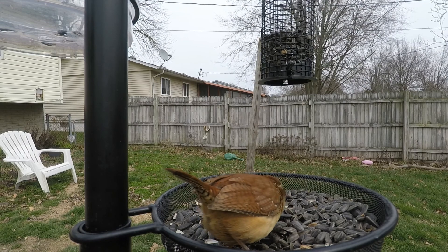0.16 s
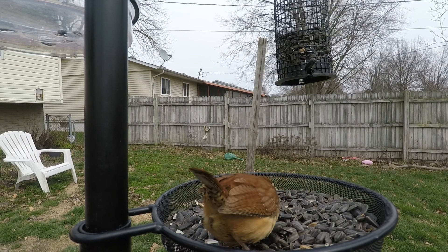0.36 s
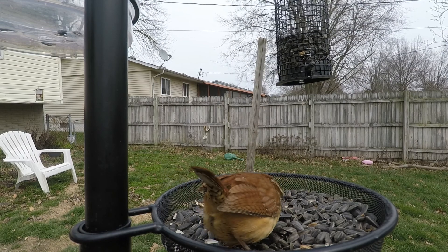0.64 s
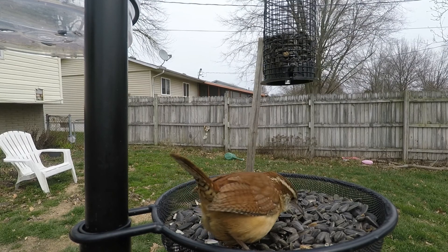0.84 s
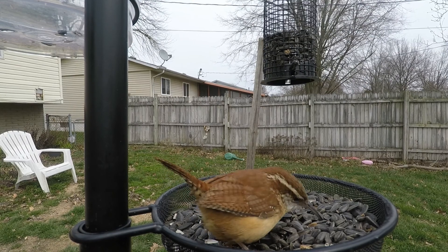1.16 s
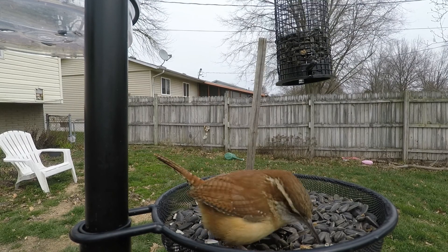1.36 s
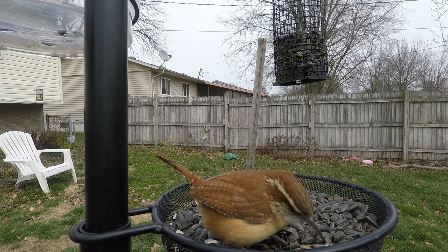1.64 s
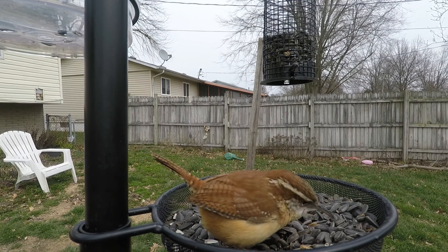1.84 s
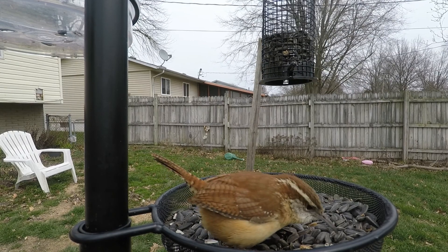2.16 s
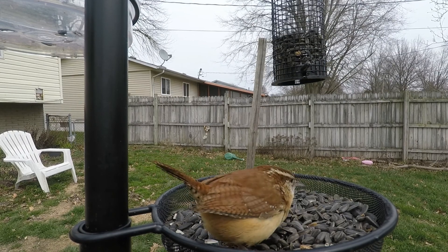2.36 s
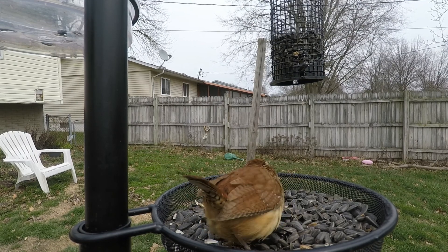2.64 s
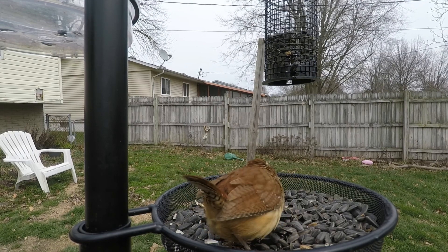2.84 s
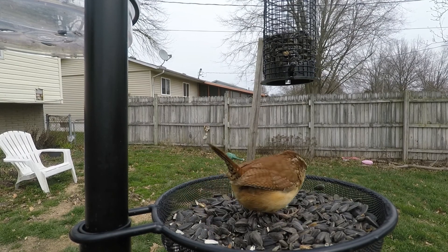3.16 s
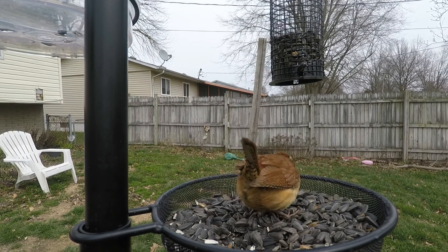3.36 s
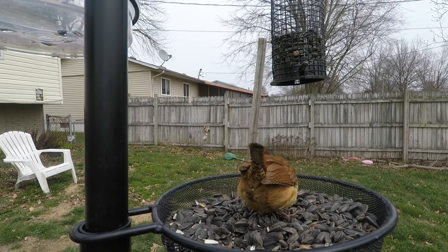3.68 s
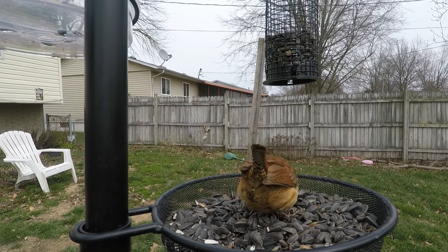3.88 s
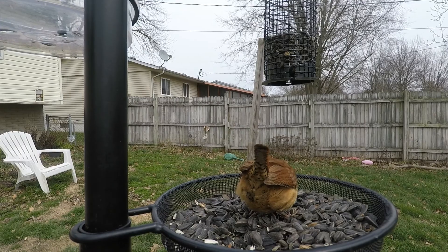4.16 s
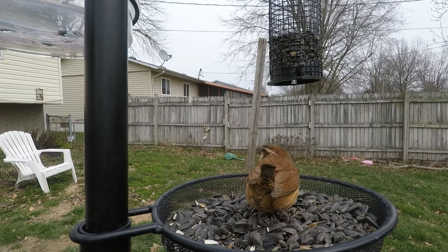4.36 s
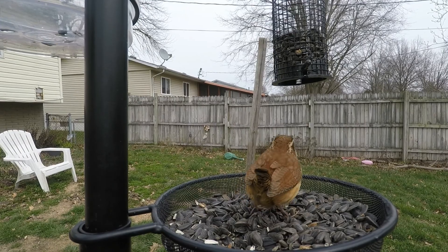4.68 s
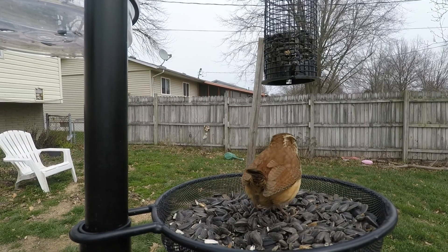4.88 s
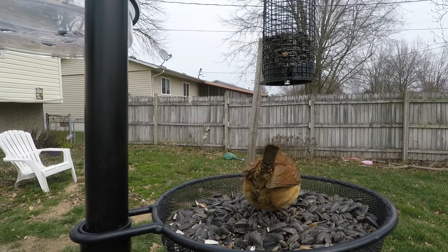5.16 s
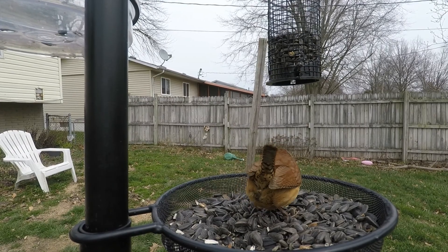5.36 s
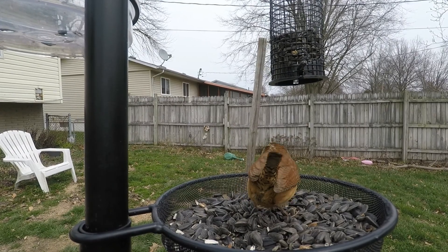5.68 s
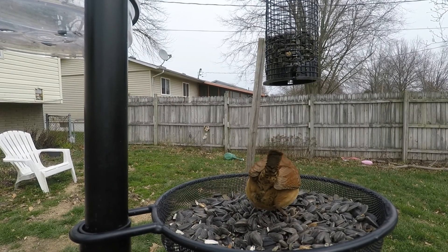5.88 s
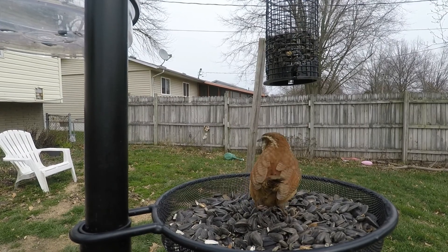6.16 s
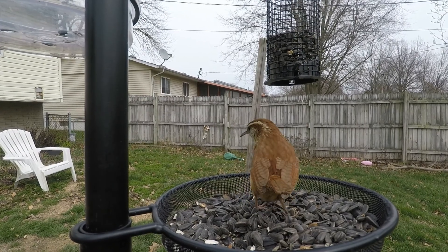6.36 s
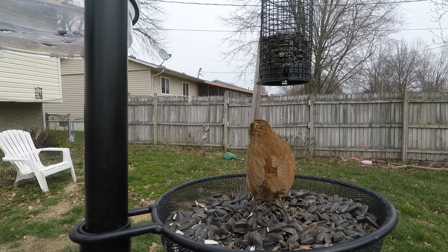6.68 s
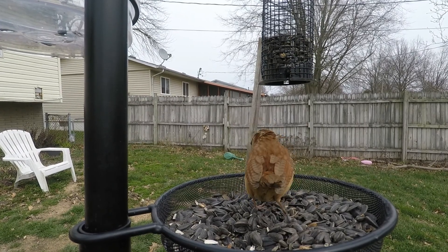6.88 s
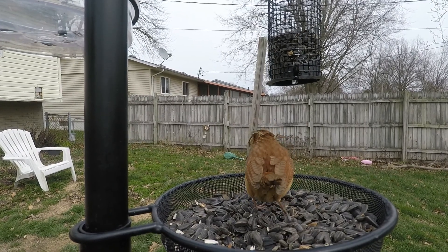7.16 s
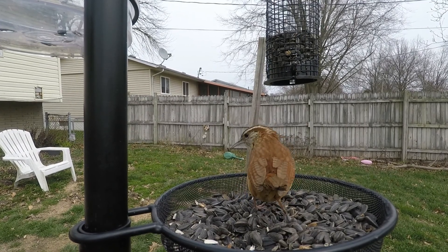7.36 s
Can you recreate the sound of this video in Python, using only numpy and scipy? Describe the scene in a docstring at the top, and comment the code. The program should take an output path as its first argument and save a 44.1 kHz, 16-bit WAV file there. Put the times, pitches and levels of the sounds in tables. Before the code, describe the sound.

Outdoors in a yard, low wind rumble swells and dips on a microphone mounted on a feeder pole, over faint airy hiss. From 0 to 3 seconds sparrows chirp across the yard: quick gliding whistles at about 0.25, 0.7, 0.85, 2.2 and 2.8 seconds, slightly hoarse, with short echoes, and fainter twitters between. A low pole thump comes near 0.4. At 3.1-3.25 the wren hops: a crisp cluster of metallic snaps and seed clicks. Chirps continue, fainter, until about 4. From 4.05 pecking hits hard, with boomy thuds, hollow knocks and rattling mesh in irregular bursts, strong around 4.1-4.4, 4.7, 5.1-5.5 and 5.9-6.2. The hiss drops and only occasional chirps remain, one around 6.65. Tiny squeaks sound at 6.13 and 6.43. A dense scraping rattle with heavy thumps fills 6.8-7.05, then smaller knocks and pole rumble last until 7.5.

```python
"""In a yard, a wren hops and pecks in a mesh seed tray on a pole that also carries two microphone ports.
Its blows excite the resonant modes of pole and tray, which shake the ports almost in opposition.
Low-passed gust noise rumbles on the ports; sparrows chirp across the yard as gliding tones with echoes.
The background hiss sinks once the pecking is hard; mesh and seeds rattle, and the tray squeaks briefly."""
import sys
import numpy as np
from scipy import signal
from scipy.fft import rfft, irfft
from scipy.io import wavfile
from scipy.ndimage import uniform_filter1d

SR = 44100
rng = np.random.default_rng(int(sys.argv[2]) if len(sys.argv) > 2 else 0)


def master(y):
    """Save y as 16-bit WAV."""
    cut = np.clip(np.atleast_2d(y).T, -1, 1)
    pcm = np.round(cut * 32767)  # scale
    wavfile.write(sys.argv[1], SR, pcm.astype(np.int16))


N = 332073  # samples


def amp(db):
    """Decibel definition: amplitude ratio of a level."""
    return 10 ** (np.asarray(db) / 20)


def evened(x):
    """Normalisation to unit rms."""
    return x / np.sqrt(np.mean(abs(x) ** 2) + 1e-20)


def smoothed(x, size):
    """Low-pass filtering by a moving average passed twice."""
    return uniform_filter1d(uniform_filter1d(x, size=size), size=size)


def read(points, hz):
    """Interpolation of a spectrum along logarithmic frequency."""
    f, value = np.transpose(points)
    return np.interp(np.log(hz + 1), np.log(f + 1), value)


def curves(rows):
    """Linear interpolation in time: each column becomes one value a sample."""
    s, *columns = np.transpose(rows)
    return [np.interp(np.arange(N) / SR, s, c) for c in columns]


def add(mix, s, sound):
    """Superposition: adds a sound at time s, cut off at the end of the mix."""
    part = mix[..., round(s * SR):][..., :sound.shape[-1]]
    part += sound[..., :part.shape[-1]]


def ring(drive, hz, width):
    """Resonance: one mode as a complex pole; white drive of rms 1 gives a ring of rms 1."""
    r = np.exp(-np.pi * width / SR)
    gain = np.sqrt(2 * (1 - r * r))
    return signal.lfilter([gain], [1, -r * np.exp(2j * np.pi * hz / SR)], drive + 1e-15)


def ports(z, right_db, lag):
    """Phase difference: a vibration reaches the right port at another level and phase."""
    left = z.real * amp(-right_db / 2)
    right = (z * np.exp(-1j * lag)).real * amp(right_db / 2)
    return np.array([left, right])


def rung(drive, modes, count=0):
    """Modal superposition: the lowest count modes take the first drive, the rest the last."""
    drive = np.atleast_2d(drive)
    total = 0
    for k, (hz, width, db, right_db, lag) in enumerate(modes):
        once = ring(drive[0 if k < count else -1], hz, width * 1.62)
        # two resonances in a row leave deeper valleys between the modes
        twice = ring(once, hz, width * 1.62) * np.sqrt(np.pi * width * 1.5 / SR)
        total = total + amp(db) * ports(twice, right_db, lag)
    return total / np.sqrt(sum(amp(2 * mode[2]) for mode in modes))


def noise(spectrum, same, right_db, patchy_db, size):
    """Partial coherence: random short-time spectra in drifting patches, partly shared by both ports."""
    frames, hz = 4 * N // size + 5, np.fft.rfftfreq(size, 1 / SR)
    a, b, c, d, patches = rng.standard_normal((frames, len(hz), 5)).T
    patches = uniform_filter1d(patches, size=10, axis=0)  # across frequency
    patches = evened(uniform_filter1d(patches, size=8, axis=1))  # across time
    same = np.clip(read(same, hz), -1, 1)[:, None]
    left = a + 1j * b
    right = same * left + np.sqrt(1 - same ** 2) * (c + 1j * d)
    z = np.array([left, amp(right_db) * right])
    z *= amp(read(spectrum, hz)[:, None] + patchy_db * patches)
    return evened(signal.istft(z, nperseg=size, noverlap=size * 3 // 4)[1][:, :N])


# gusts on the ports: t/s, relative level/dB
GUSTS = [(0, -26.5), (.12, -20.5), (.27, -18.5), (.4, -29), (.57, -17), (.76, -24.5), (.85, -19),
         (.93, -23.5), (1.1, -16.5), (1.22, -23.5), (1.31, -20), (1.43, -28), (1.6, -22), (1.91, -28.5),
         (2.05, -19), (2.14, -21.5), (2.3, -16.5), (2.58, -23), (2.74, -19), (2.9, -24.5), (3.04, -17),
         (3.28, -18.5), (3.34, -32), (3.4, -23), (3.75, -26), (4.1, -23.5), (4.16, -32), (4.96, -38.5),
         (5.36, -25.5), (5.54, -30.5), (5.87, -35.5), (6.0, -30.5), (6.34, -36.5), (6.6, -23.5),
         (6.84, -20.5), (6.95, -38), (7.24, -19), (7.34, -28), (7.53, -28.5)]
# spectrum of the rumble: f/Hz, relative level/dB
RUMBLE = [(12, -9.5), (25, 0), (40, 1.5), (60, -5), (90, -9.5), (140, -18), (220, -26), (320, -37.5),
          (500, -49.5), (900, -84)]
# likeness of left and right: f/Hz, correlation
RUMBLE_SAME = [(30, 0.95), (100, 0.87), (200, 0.17)]


def wind():
    """Turbulent pressure: low noise on the ports, swelling with the gusts."""
    rumble = noise(RUMBLE, RUMBLE_SAME, right_db=4.5, patchy_db=1.5, size=4096)
    return amp(curves(GUSTS)[0] + 1.5) * rumble


# background of the yard: t/s, relative level/dB
YARD = [(0.0, -65.5), (0.29, -64), (3.98, -64), (4.42, -75), (5.49, -75.5), (6.71, -69), (7.53, -72)]
# spectrum of the hiss: f/Hz, relative density/dB per Hz
HISS = [(200, -26), (300, 5.5), (450, -2), (650, -7.5), (900, -4), (1200, -10), (1700, -13.5), (2400, -19),
        (3200, -19), (4500, -24.5), (7300, -21), (10500, -27), (12000, -34.5), (14500, -44)]
# likeness of left and right: f/Hz, correlation
HISS_SAME = [(300, 0.29), (800, -0.49), (2000, -0.25), (3300, 0.5), (5300, 0.18), (9000, -0.059)]


def yard_hiss():
    """Broadband noise: the yard's hiss follows a slow level curve."""
    hiss = noise(HISS, HISS_SAME, right_db=2.0, patchy_db=1.07, size=1024)
    return amp(curves(YARD)[0] + 17.5) * hiss


# swing of the pole: t/s, level/dB
SWAY = [(0, -29), (.31, -44), (.39, -14.5), (.52, -19.5), (.65, -27), (1.3, -35), (1.75, -36), (2.8, -34.5),
        (3.16, -21), (3.4, -27), (3.92, -31), (3.99, -19), (4.06, -22), (4.11, -13), (4.45, -11),
        (4.52, -18.5), (4.65, -11), (5.03, -13), (5.12, -14.5), (5.24, -20), (5.31, -11), (5.45, -18.5),
        (5.8, -15), (5.87, -22.5), (5.96, -13), (6.13, -13.5), (6.45, -10.5), (6.59, -17.5), (6.8, -15.5),
        (6.99, -7.5), (7.05, -21.5), (7.21, -13.5), (7.31, -25), (7.41, -16.5), (7.53, -15)]
# lowest mode of the pole: f/Hz, width/Hz, right port re left/dB, right port lag/rad
POLE = (56, 14, 0, 2.6)


def steadied(z, share):
    """Envelope compression: removes a share of the random swell, so that a ring follows its curve."""
    return evened(z / (abs(z) + 1e-9) ** np.clip(share, 0, 1))


def pole():
    """Fundamental resonance: the pole swings at its lowest mode, wavering a little."""
    hz, width, right_db, lag = POLE
    swing = ring(ring(rng.standard_normal(N), hz, width), hz, width)
    return np.sqrt(2) * amp(curves(SWAY)[0]) * ports(steadied(swing, .75), right_db, lag)


# jolts after which the tray shudders on: t/s, drumming level/dB, hold/s
JOLTS = [(0.35, -20, 0.014), (0.703, -28, 0.0092), (1.635, -29.5, 0.025), (1.943, -25, 0.009),
         (2.608, -24.5, 0.0091), (2.703, -24.5, 0.0057), (3.184, -23.5, 0.042), (3.44, -34.5, 0.027),
         (3.666, -24.5, 0.019), (3.963, -21, .005), (4.089, -14.5, 0.013), (4.21, -13, 0.12),
         (4.368, -18, 0.03), (4.724, -11, 0.061), (4.927, -25.5, 0.025), (5.058, -23.5, .01),
         (5.135, -15.5, 0.009), (5.222, -10.5, 0.017), (5.445, -9.5, 0.041), (5.855, -15.5, 0.0036),
         (5.932, -17.5, 0.026), (6.167, -15.5, 0.055), (6.304, -24.5, 0.016), (6.474, -28.5, 0.027),
         (6.6, -26.5, 0.037), (6.724, -19.5, .01), (6.862, -18, 0.25), (7.242, -24.5, 0.017)]
JOLT_RISE_DB_PER_S, JOLT_FALL_DB_PER_S = 496.5, 181


def jolted():
    """Energy summation: jolts rise fast, hold and die away, and their powers add."""
    s, db, hold = np.transpose(JOLTS)[:, :, None]
    since = np.arange(0, N, 32) / SR - s  # every 32 samples
    rise_db = JOLT_RISE_DB_PER_S * np.minimum(since, 0)
    fall_db = JOLT_FALL_DB_PER_S * np.maximum(since - hold, 0)
    power = amp(2 * (db + rise_db - fall_db)).sum(0)
    return np.repeat(np.sqrt(power), 32)[:N]


# tray between jolts: t/s, drumming level/dB, relative rattle level/dB
REST = [(0, -41, -58), (.36, -42, -39.5), (.56, -46.5, -48.5), (1.4, -34, -46), (2.0, -47, -50.5),
        (2.9, -46, -50), (3.19, -27.5, -33), (3.5, -35, -48.5), (4.0, -32.5, -49), (4.5, -36, -47.5),
        (4.7, -25, -36.5), (5.35, -34.5, -43.5), (5.88, -33, -40.5), (5.96, -28.5, -34), (6.12, -25.5, -30),
        (6.25, -28, -44), (6.4, -36, -36), (6.75, -32, -38.5), (7.2, -34.5, -44), (7.53, -29.5, -34)]
# low tray modes: f/Hz, width/Hz, relative level/dB, right port re left/dB, right port lag/rad
DRUM = [(174.2, 13.7, -1.5, 3.84, 2.77), (208.4, 14.3, -1, 5.16, 2.655), (233.8, 10.2, -0.5, 4.6, 2.733)]


def shudder(jolts):
    """Forced vibration: wind and the bird's weight keep the low tray modes drumming."""
    drum = rung(rng.standard_normal(N), DRUM)
    swell = np.sqrt(abs(uniform_filter1d((drum ** 2).mean(0), size=900)) + 1e-9)
    level = np.hypot(amp(curves(REST)[0]), jolts)
    return level * evened(drum / swell ** 0.27)  # part of the random swell is taken out


RATTLE_DB, RATTLE_SLOPE = -22.5, 0.99  # drive at a jolt of 0 dB, and dB of rattle per dB of jolt
CLUMP_DB = 2.5  # seeds shift in uneven clumps


def rattle(jolts):
    """Random excitation: mesh and seeds rattle along with the shudder, as a noise drive for the tray."""
    clumps = evened(smoothed(rng.standard_normal(N), 280))
    level = np.hypot(amp(curves(REST)[1]), amp(RATTLE_DB) * jolts ** RATTLE_SLOPE)
    return level * amp(CLUMP_DB * clumps) * rng.standard_normal(N)


# Sparrow calls, each a list of notes with rows:
# t/s from the call's start, f/Hz, whistle level/dB, octave overtone level/dB (before the CALLING factors)
CHEEP = [
    [(-.036, 3350, -38, -23.5), (-.02, 3180, -34, -27), (-.004, 2895, -24, -15)],
    [(0, 3280, 4, -24), (.007, 3700, -5.5, -41.5), (.011, 4640, -2, -48), (.035, 4377, -2.5, -48),
     (.052, 4054, 0.5, -42), (.066, 3410, -16, -32.5)],
    [(.092, 2700, -41, -16), (.105, 2956, -25, -16.5), (.116, 3280, -9.5, -25), (.126, 3670, -15.5, -31),
     (.14, 3290, -18.5, -37)],
]
ARCH = [
    [(-.022, 4540, -27, -56), (-.007, 5320, -9.5, -40), (.01, 5520, -27, -47)],
    [(0, 2680, -18.5, -17), (.038, 3240, -6.5, -37.5), (.065, 3500, 3, -34), (.085, 3250, -7, -32.5),
     (.112, 2730, -0.5, -27)],
]
DOUBLE = [
    [(0, 2960, -34, -13), (.05, 3250, -19, -16), (.06, 4570, 1, -42), (.07, 5150, -8.5, -16.5),
     (.084, 4100, -0.5, -15), (.096, 3950, -13, -28), (.106, 3020, -10.5, -6.5), (.125, 2930, -24, -10.5),
     (.15, 2980, -12.5, -7), (.166, 3750, -11.5, -19), (.18, 2980, -14, 1.5), (.198, 3150, -18, -17)],
]
PEAK = [
    [(0, 2793, -13, -31), (.02, 3700, -3, -40), (.036, 4500, 2, -37), (.048, 3640, 2, -20),
     (.06, 2700, -6, -16), (.078, 2110, -4, -24)],
]
RISE = [
    [(0, 1702, -15, -30), (.042, 2080, -5, -39), (.066, 3050, -2, -28), (.085, 3680, 8, -38)],
]
SPIKE = [
    [(0, 2500, -22, -30), (.007, 2960, -10, -30), (.01, 3740, 0, -34), (.021, 4420, -5, -37.5),
     (.034, 3810, -1, -30), (.047, 3050, -4.5, -19), (.061, 2505, -1.5, -35)],
]
# who calls when: call, t/s, relative level/dB, pitch factor, length factor
CALLING = [(DOUBLE, .25, -38, 1.001, 1.001), (ARCH, .71, -40, 1.001, 0.99), (CHEEP, .848, -33, 0.98, 0.95),
           (RISE, 1.4, -62, .9, .9), (RISE, 1.775, -59, 1, 0.93), (RISE, 2.085, -64, .99, .97),
           (CHEEP, 2.161, -33, 1.001, 1.01), (PEAK, 2.345, -50, 1.02, 1.12), (RISE, 2.39, -55, .95, .9),
           (RISE, 2.664, -55, 1.02, 1.01), (ARCH, 2.778, -41.5, 0.98, 1.03), (RISE, 2.95, -58, 1, 1.01),
           (CHEEP, 3.074, -36.5, 1.02, 1.01), (RISE, 3.239, -58, 1.002, .995), (RISE, 3.53, -54, 1.001, 1),
           (SPIKE, 3.792, -46, 1.001, 1.001), (DOUBLE, 4.055, -52, .99, 1.01),
           (ARCH, 4.63, -51, 1.01, 0.96), (CHEEP, 5.475, -52, 1, 1.02), (ARCH, 5.768, -61, .94, 1.001),
           (PEAK, 6.348, -60, 1.02, 1.2), (CHEEP, 6.646, -43, 1.001, 1.01),
           (SPIKE, 6.815, -49.5, 1.02, .97)]
# thin whistles further off: t/s, length/s, start f/Hz, middle f/Hz, end f/Hz, relative level/dB
WHISTLES = [(0.017, 0.048, 6170, 5500, 5500, -66), (0.082, 0.038, 4570, 4090, 3100, -58.5),
            (0.11, 0.019, 4280, 4843, 5050, -60.5), (0.135, 0.027, 6060, 6150, 6330, -55),
            (0.174, 0.021, 6250, 6260, 6850, -54), (.175, 0.041, 6680, 6900, 7150, -56),
            (0.314, 0.014, 4540, 4550, 4840, -45.5), (.323, .012, 5500, 5700, 5850, -41),
            (1.165, .022, 2900, 3300, 4300, -72), (1.185, .025, 4620, 4350, 4000, -64),
            (1.225, 0.033, 3800, 3250, 2850, -66), (1.265, 0.041, 3150, 4040, 3500, -64),
            (1.269, 0.043, 2990, 3550, 2730, -65), (1.465, 0.032, 3050, 3180, 3220, -60),
            (2.338, .035, 3100, 3360, 3820, -61), (2.409, 0.043, 4320, 3910, 3550, -54.5),
            (2.449, 0.022, 3300, 3450, 3380, -56.5), (2.468, 0.019, 3300, 3120, 2880, -57),
            (2.491, .04, 2930, 3320, 2750, -62), (2.35, .012, 5000, 5100, 5050, -54),
            (2.644, 0.046, 5170, 5050, 5220, -56.5), (2.681, 0.035, 5300, 4290, 3280, -56),
            (2.753, 0.039, 3470, 4080, 3700, -58), (2.762, 0.022, 2300, 2700, 2950, -63),
            (3.038, 0.032, 2496, 2990, 3730, -57), (3.432, 0.078, 6160, 5080, 3480, -66),
            (3.33, 0.023, 2030, 2570, 3160, -73), (3.622, 0.024, 2220, 2580, 3070, -63),
            (3.725, 0.043, 5800, 6120, 5500, -52.5), (3.768, 0.035, 3390, 4170, 5130, -51.5),
            (3.846, 0.021, 3900, 4300, 4600, -54), (3.869, 0.046, 2820, 3500, 2980, -59.5),
            (4.382, 0.1, 6540, 6510, 6900, -66), (5.395, 0.023, 2940, 3730, 4530, -66),
            (5.411, 0.032, 2600, 4300, 3500, -63), (7.131, 0.012, 3450, 3500, 3500, -69),
            (6.347, 0.017, 4300, 4800, 5300, -73), (5.77, .04, 5250, 5300, 5250, -76),
            (6.467, .03, 3380, 3350, 3450, -65), (6.506, .03, 3580, 3380, 3350, -72),
            (6.368, .012, 4700, 5060, 5600, -68), (3.502, .02, 3860, 3580, 3300, -60.5),
            (2.364, 0.014, 4300, 4800, 5200, -54), (6.586, .05, 4650, 4630, 4800, -73),
            (6.733, 0.12, 4900, 4940, 4860, -72), (6.882, 0.15, 4800, 4950, 4750, -71)]
WHISTLE_ENDS_DB, WHISTLE_OVERTONE_DB = -3.5, -29.5  # ends re middle; overtone re whistle
# behind the fence: direct sound a little weakened, so the echo stands out more
HIDDEN, HIDDEN_DB = (DOUBLE, PEAK), -2.5


def notes():
    """Scaling of pitch, time and level: each note as direct gain and rows of t, f and two levels."""
    listed = []
    for call, s, db, pitch, length in CALLING:
        gain = amp(HIDDEN_DB * (call in HIDDEN))
        for note in call:
            listed.append((gain, np.array(note) * [length, pitch, 1, 1] + [s, 0, db, db]))
    dip = np.array([WHISTLE_ENDS_DB, 0, WHISTLE_ENDS_DB])
    for s, length, *hz, db in WHISTLES:
        times = s + length * np.arange(3) / 2
        listed.append((1, np.transpose([times, hz, db + dip, db + dip + WHISTLE_OVERTONE_DB])))
    return listed


FADING_DB, NEAR_DB = 4.5, -34  # leaves and air make notes fainter than NEAR_DB come and go
TREMBLE, FAR_TREMBLE = .011, 1.4  # share of the pitch; faint notes tremble this much more
FLUTTER_DB, HOARSE = 1, 1.18  # whistle level spread; noise share in the overtone


def chirp(rows):
    """Frequency modulation: a gliding whistle of trembling pitch and a hoarse octave overtone."""
    s, *columns = np.transpose(rows)
    t = np.arange(s[0], s[-1], 1 / SR)
    hz, db, over_db = (uniform_filter1d(np.interp(t, s, c), size=120, mode="nearest") for c in columns)
    wobble = evened(uniform_filter1d(rng.standard_normal((3, SR // 3)), size=50))
    tremble, flutter, hoarse = wobble[:, :len(t)]
    faint = np.clip((NEAR_DB - db.max()) / 10, 0, 1)
    pitch = hz * (1 + TREMBLE * (1 + FAR_TREMBLE * faint) * tremble)
    phase = 2 * np.pi * np.cumsum(pitch) / SR
    whistle = amp(db + FLUTTER_DB * flutter) * np.sin(phase)
    overtone = amp(over_db) * (1 + HOARSE * hoarse) * np.sin(2 * phase)
    fading = evened(smoothed(rng.standard_normal(SR // 3), 250))[:len(t)]
    tone = np.sqrt(2) * (whistle + overtone) * amp(FADING_DB * faint * fading)
    return s[0], tone * signal.windows.tukey(len(t), .25)


# colour of the yard's echo: f/Hz, relative level/dB
WALLS = [(2000, 6.5), (3300, 3.5), (4200, -3), (6000, 7), (8000, 5)]


def yard_echo(x, t60, blur):
    """Diffuse reflection: sparse taps from fences and walls; moving branches blur the pitch."""
    size = SR // 2
    taps = np.zeros((2, size))
    at = np.arange(300, size - 20, 20) + rng.integers(0, 20, (2, (size - 301) // 20))
    np.put_along_axis(taps, at, rng.choice([-1., 1.], at.shape), 1)
    taps *= amp(-60 * np.arange(size) / SR / t60)
    colour = amp(read(WALLS, np.fft.rfftfreq(size, 1 / SR)))
    taps = irfft(rfft(taps / np.linalg.norm(taps[0])) * colour)
    flutter = evened(smoothed(rng.standard_normal(N), 24))  # level flutter spreads each pitch
    return signal.fftconvolve((x * (1 + blur * flutter))[None], taps, axes=1)[:, :N]


# colour of the slap from the wall: f/Hz, level/dB
SLAP = [(2500, -11), (3000, -12), (3430, -5.5), (4000, -16), (4600, -17), (6000, -21)]


def sparrows():
    """Multipath propagation: chirps with a ground bounce, one slap from a wall and the yard's echo."""
    both = np.zeros((2, N))
    for gain, rows in notes():
        s, sound = chirp(rows)
        add(both, s, np.outer([gain, 1], sound))
    bounce = .3 * np.roll(both, round(.0045 * SR), axis=1)
    near, calls = both + bounce  # direct path; full level for the reflections
    direct = np.array([np.roll(near, 1) * amp(2.0), near * amp(0.7)])
    colour = amp(read(SLAP, np.fft.rfftfreq(2 ** 19, 1 / SR)))
    wall = irfft(rfft(calls, 2 ** 19) * colour)[:N]
    delay = round(.048 * SR)
    slap = np.array([np.roll(wall, delay), np.roll(wall, delay + 3)])
    return direct + slap + amp(-8.5) * yard_echo(calls, t60=0.43, blur=0.69)


SOFT_CYCLES = 550  # long contacts are soft: treble ends at this many cycles per contact t60
RISE_SHARE = 0.04  # a scrape swells over this share of its t60
GRIT_DB = 1.5  # a scrape is a string of uneven ticks


def contact(t60):
    """Impact and friction: a sharp blow and a gritty scrape, duller the longer the contact lasts."""
    t, t60 = np.arange(6000) / SR, np.clip(t60, .01, .3)
    blow = 0.076 / t60 * np.exp(-t / .00008)  # short contacts start hardest
    hiss, grit = rng.standard_normal((2, len(t)))
    shape = amp(-60 * t / t60) * np.minimum(t / (RISE_SHARE * t60), 1)
    gritty = shape * hiss * amp(GRIT_DB * evened(uniform_filter1d(grit, size=40)))
    scrape = evened(gritty) * np.sqrt(np.mean(shape ** 2))  # grit moves energy about, adds none
    b, a = signal.butter(2, min(SOFT_CYCLES / t60, SR / 2 - 1000), fs=SR)
    return signal.lfilter(b, a, blow + scrape)


# beak and feet on the tray: t/s, relative thump, knock and snap level/dB, contact t60/s,
# then level of upper re lower modes/dB for thump, knock and snap
KNOCKS = [(3.074, -36, -55, -45, 0.024, 8, 1, 1), (3.13, -27, -33.5, -47, 0.13, 6, 0, 1),
          (3.163, -31, -26, -45, 0.055, 5, -1, 1), (3.19, -44, -26, -13, 0.035, -1, -10, 5),
          (3.193, -44, -17.5, -13, 0.021, 1, -4, 5), (3.202, -44, -36, -19, 0.035, 1, -2, 12),
          (3.213, -41, -23, -13, 0.018, 1, 3, 3), (3.218, -44, -36, -20, 0.029, 3, 3, 8),
          (3.227, -40, -42, -33, .016, -1, 1, 3), (3.23, -38, -40, -24, 0.039, 9, -1, 6),
          (4.065, -16, -17, -41, 0.023, -13, 0, -1), (4.078, -18.5, -14, -27.5, 0.026, 9.5, 10, 11),
          (4.123, -19.5, -16, -24, 0.025, 2, 3, -1), (4.142, -25.5, -31, -33, 0.05, 10, -1, 3),
          (4.175, -26, -32, -41, .063, -6, 1, 2), (4.194, -15.5, -33, -37, 0.034, -11, 1, 7),
          (4.214, -20.5, -43, -50, 0.031, -16.5, 3, 1), (4.236, -27, -42, -52, 0.036, -2, 2, 1),
          (4.282, -23, -29, -50, 0.04, 3, 5, 1), (4.298, -27, -47, -57, 0.042, -4, -1, 5),
          (4.258, -31, -38, -58, .06, 1, 3, 1), (4.315, -28, -48, -65, 0.058, 12, 1, 1),
          (4.36, -24.5, -40, -59, .025, 4, 1, -4), (4.388, -30, -31, -35.5, 0.029, 11, 5, 2),
          (4.665, -35.5, -34.5, -46, 0.037, -3, 7, 6), (4.708, -27, -46, -55, .039, -9, 3, 1),
          (4.727, -26.5, -36, -57, 0.037, -5, 2, 3), (4.737, -26, -29, -52, 0.03, 13, 3, 5),
          (4.744, -25, -45, -39, 0.017, 0, 1, 3), (4.876, -28.5, -33, -35.5, 0.024, -4, 5, 3),
          (4.937, -29, -33, -44, 0.028, -2, -1, 4), (4.963, -49, -67, -49, 0.025, -1, 1, 10),
          (5.052, -34.5, -43, -49, 0.036, -1, 1, 6), (5.117, -21, -16, -37, 0.021, 7.5, -5, -2),
          (5.128, -21.5, -43, -31.5, 0.033, 5.5, 4, -2), (5.189, -41, -29, -43.5, 0.071, -3, 2, -1),
          (5.21, -28, -14.5, -29.5, 0.015, 2, -4, -3), (5.228, -26, -27, -31.5, .052, 5, -4, 5),
          (5.288, -43, -40, -61, 0.053, -6, -2, 2), (5.433, -23, -25.5, -36, 0.065, -10.5, -6, -3),
          (5.453, -30, -32, -37, 0.092, -1, -3, 3), (5.471, -18.5, -22.5, -27.5, 0.016, -6.5, 5, 6),
          (5.537, -41, -37, -44, 0.027, 5, 2, 1), (5.578, -35, -41.5, -45, 0.021, -11, 10, 10),
          (5.82, -42, -38, -49, 0.13, 4, -2, 5), (5.84, -36, -33, -40, 0.044, 2, 4, -4),
          (5.853, -26.5, -27.5, -29, 0.028, -5, 6, -1), (5.918, -12, -43, -46, 0.038, 2.5, 3, 2),
          (6.286, -45, -55, -52, .015, -2, -1, 5), (6.171, -23, -29.5, -32.5, 0.033, -0.5, -4, -1),
          (6.212, -29, -54, -47, 0.039, -5, -1, 3), (6.319, -23, -30, -40.5, 0.035, 0, 1, 1),
          (6.423, -28.5, -36, -44, 0.057, -2, 5, -2), (6.448, -42, -34.5, -43, 0.038, 4, -2, -6),
          (6.609, -32.5, -41, -36, 0.034, -8, -9, 0), (6.697, -28.5, -40, -35, 0.083, -12, 1, -2),
          (6.707, -33, -42, -36, 0.039, 0, -5, -3), (6.798, -31.5, -36, -31, 0.062, -1, -5, -4),
          (6.846, -26, -30, -30, 0.086, -1, 8, 1), (6.858, -31.5, -23, -33, 0.13, -3, 10, 6),
          (6.875, -44.5, -31, -32, 0.21, 11, 9, -1), (6.866, -40, -32, -32, 0.11, 2, 9, -3),
          (6.886, -30, -29, -35, 0.073, 3, 6, 0), (6.899, -33, -24, -32, 0.059, -5, 9, -3),
          (6.909, -27, -25, -31, 0.095, 0, 11, 3), (6.926, -18, -30, -36.5, 0.099, 13, 11, 3),
          (6.939, -12.5, -38, -54, 0.053, 1, -2, 0), (7.003, -15, -38, -39, .03, -10, 13, 4),
          (7.051, -30, -39, -56, 0.018, -2, 6, -1), (7.112, -42, -45, -59, 0.053, 1, 8, -4),
          (7.125, -29, -56, -61, 0.029, 3, 0, 1), (7.193, -28.5, -39, -47, 0.047, 5, 8, -12),
          (7.201, -37, -44, -51, 0.058, -1, 10, -5), (7.242, -31, -38.5, -43, 0.042, 10, 9, -11),
          (7.254, -41, -42, -45, .04, 3, 9, -8), (7.291, -37, -56, -67, 0.052, 9, 1, 3),
          (7.333, -36, -37, -52, 0.038, 3, 10, -2), (7.373, -27.5, -47, -62, 0.033, 2.5, 2, 1),
          (7.413, -34, -48, -54, 0.022, 10, 5, 1), (7.421, -23.5, -39, -57, 0.026, 7, 6, 1),
          (7.451, -23, -30.5, -55, 0.03, 7, 1, 1)]
# seed husks crack: t/s, relative level/dB
HUSKS = [(3.072, -46), (3.161, -51), (3.189, -43), (3.212, -49), (3.62, -55), (4.119, -55), (4.709, -62),
         (4.728, -64), (5.119, -61.5), (5.21, -56), (5.469, -44.5), (5.853, -46.5), (6.61, -70),
         (7.002, -57)]
HUSK_T60_S = 0.037
# modes of pole and tray, in groups of rising frequency:
# f/Hz, width/Hz, relative level/dB, right port re left/dB, right port lag/rad
DULL = [(430, 67, -3, 0.0038, 3.78), (502.5, 43, -2.5, 0, 3.39), (639, 71, 0.5, 0.0043, 2.882),
        (699, 40, -12.5, 0, 2.72)]
KNOCKING = [(883, 24, 0.5, -0.5, 2.86), (920, 51, 8, 1.1, 2.59), (1082, 56, 2.5, 4, 1.83),
            (1211, 99, 0.5, -3, 1.74), (1341, 25, -6.5, -3.5, 2.17)]
RINGING = [(1530, 74, 7.3, -0.11, 2.87), (1790, 76, 1, -1.2, 2.84)]
BRIGHT = [(2206, 100, 1, -3, 3.4), (2360, 116, -1.5, -7.5, 4.83), (2770, 130, -12, 1, 4.77),
          (3022, 210, -8, -0.5, 5.43), (4225, 290, -14, 3, 5.8)]
TICK = [(5730, 610, -5.5, 2, 0.9), (7290, 1020, -2, 5.6, -1.7), (9100, 570, -15, 4, 0.98)]


def pecks(rattling):
    """Modal excitation: contacts and rattle drive groups of tray modes; cracking husks add a high tick."""
    drives, husks = np.zeros((3, 2, N)), np.zeros(N)  # thump, knock, snap; each for lower, upper modes
    for s, thump_db, knock_db, snap_db, t60, *tilts_db in KNOCKS:
        levels_db = np.array([thump_db, knock_db, snap_db])[:, None] + np.outer(tilts_db, [-.5, .5])
        add(drives, s, amp(levels_db)[..., None] * contact(t60))
    for s, db in HUSKS:
        add(husks, s, amp(db) * contact(HUSK_T60_S))
    thump, knock, snap = drives
    thud = amp(7.5) * rung(thump[0], DRUM)  # the dull part of a blow also starts the low modes
    dull = rung(amp(3.5) * thump + amp([[-9], [-1]]) * rattling, DULL, count=1)
    knocking = rung(amp(-2.0) * knock + amp([[-21], [-15]]) * rattling, KNOCKING, count=3)
    ringing = rung(amp(-12) * snap[0] + amp(-10) * knock[1] + amp(-24.0) * rattling, RINGING)
    bright = rung(amp(-6.5) * snap + amp(-32.5) * rattling, BRIGHT, count=2)
    tick = rung(amp(4.5) * husks + amp(-38.5) * snap[1], TICK)
    return thud + dull + knocking + ringing + bright + tick


# short squeaks in the tray: t/s, length/s, start f/Hz, end f/Hz, level/dB
SQUEAKS = [(6.128, 0.049, 1387, 1280, -36.5), (6.434, 0.036, 1090, 1207, -31),
           (6.437, 0.04, 2210, 2310, -42), (6.696, 0.029, 857, 910, -39), (6.785, 0.026, 1250, 1260, -51),
           (5.925, 0.028, 1180, 1230, -53), (7.328, 0.027, 1930, 1736, -56)]


def squeaks():
    """Structure-borne sound: brief gliding tones travel up the pole like the knocks."""
    out = np.zeros((2, N))
    for s, length, start_hz, end_hz, db in SQUEAKS:
        hz = np.linspace(start_hz, end_hz, round(length * SR))
        tone = np.exp(2j * np.pi * np.cumsum(hz) / SR) * np.hanning(len(hz))
        add(out, s, np.sqrt(2) * amp(db) * ports(tone, -1.5, 2.03))
    return out


def scene():
    """Linear superposition of all sources at the two ports."""
    jolts = jolted()
    air = wind() + yard_hiss()
    tray = shudder(jolts) + pecks(rattle(jolts)) + squeaks()
    return air + pole() + tray + sparrows()


CEILING = 1.05  # amplitude that the soft overload approaches
EDGE_HZ = 14950


def record(dry):
    """Saturation and band limiting: soft overload on the strongest swings, soft ends, low-pass."""
    limited = dry / (1 + abs(dry / CEILING) ** 4) ** .25
    limited = limited * signal.windows.tukey(N, .0008)
    edge = signal.firwin(1023, EDGE_HZ, window=("kaiser", 10), fs=SR)
    return signal.oaconvolve(limited, edge[None], "same")


dry = scene()
out = record(dry)
master(out)
```